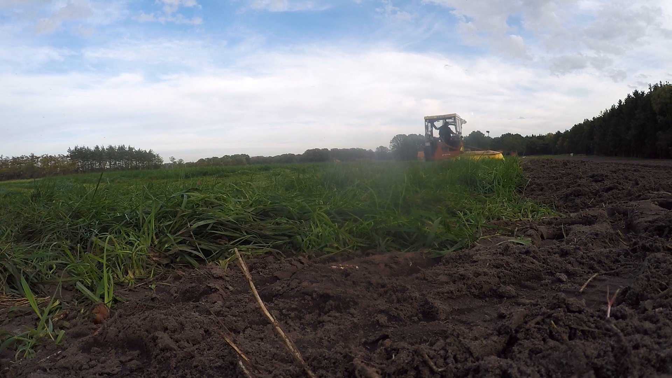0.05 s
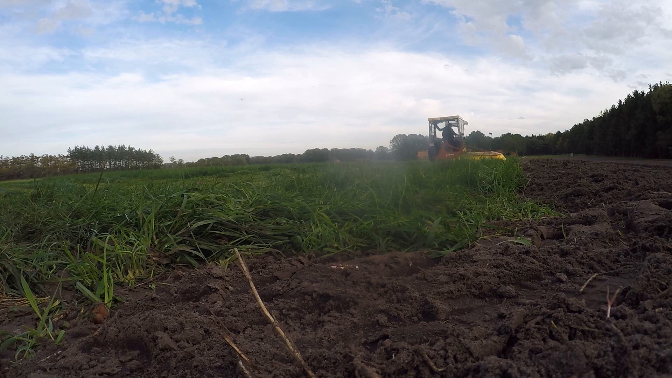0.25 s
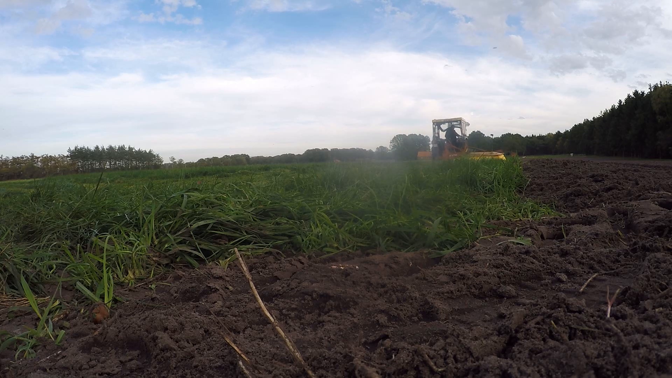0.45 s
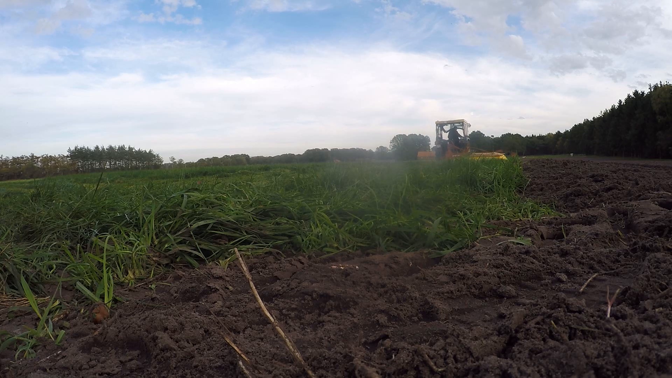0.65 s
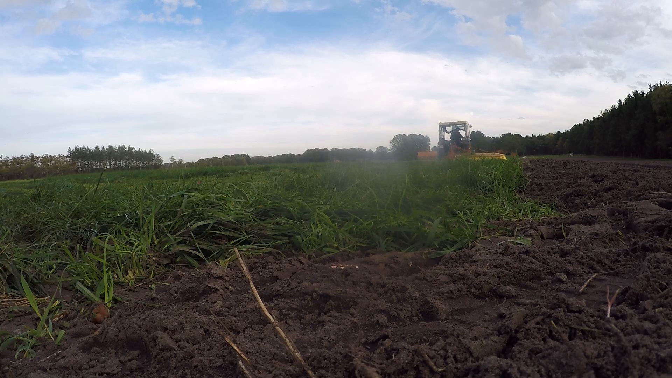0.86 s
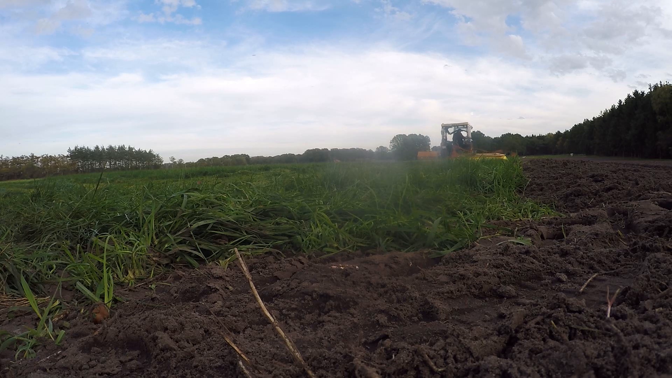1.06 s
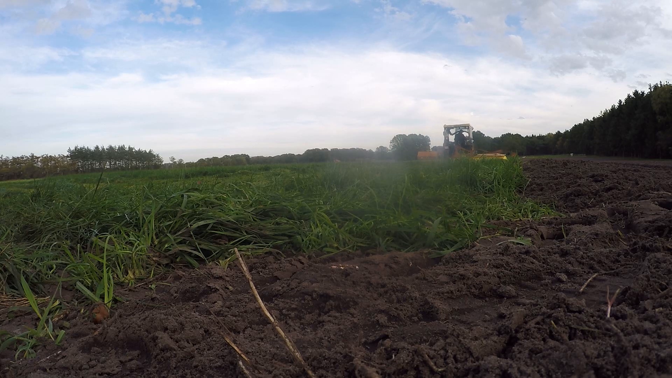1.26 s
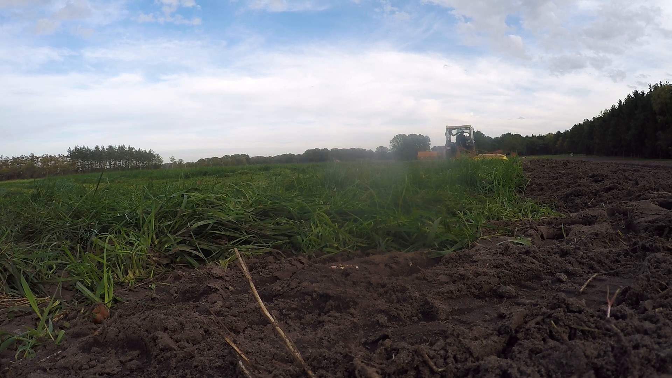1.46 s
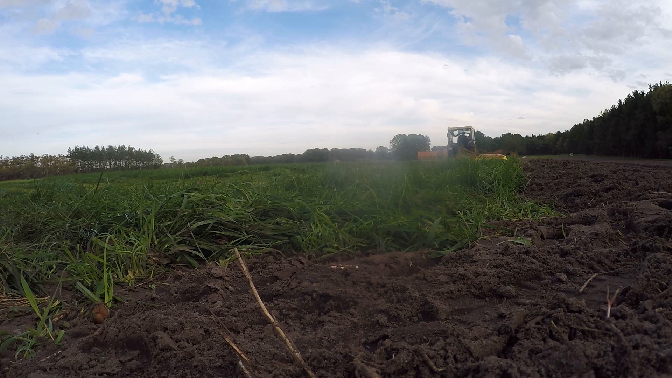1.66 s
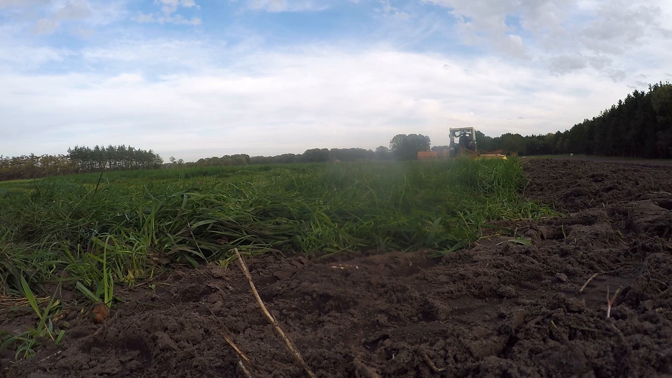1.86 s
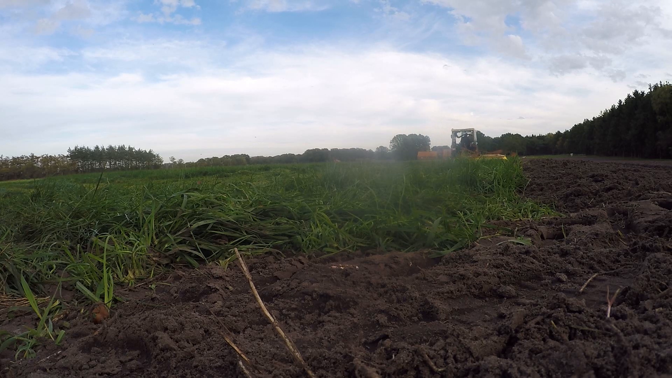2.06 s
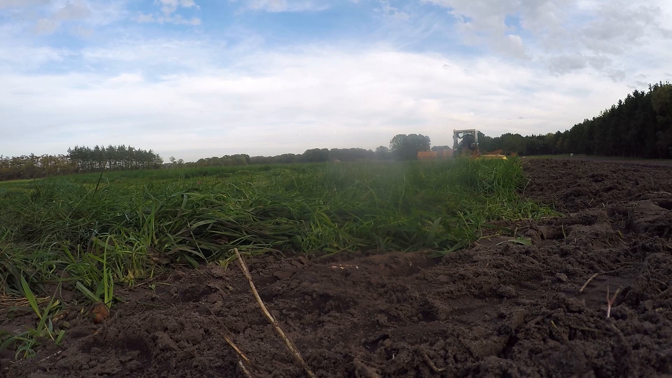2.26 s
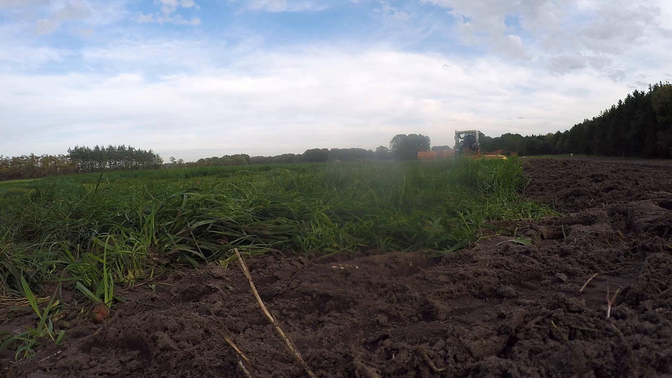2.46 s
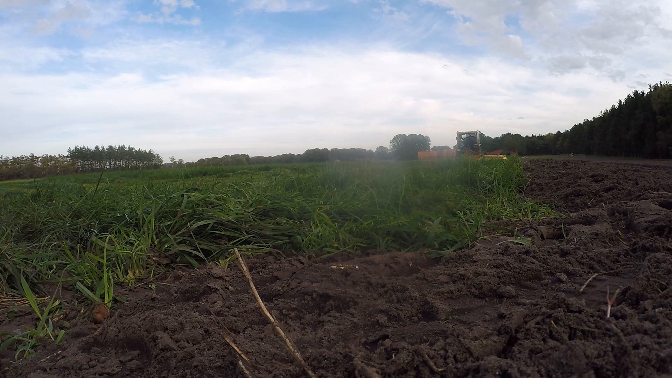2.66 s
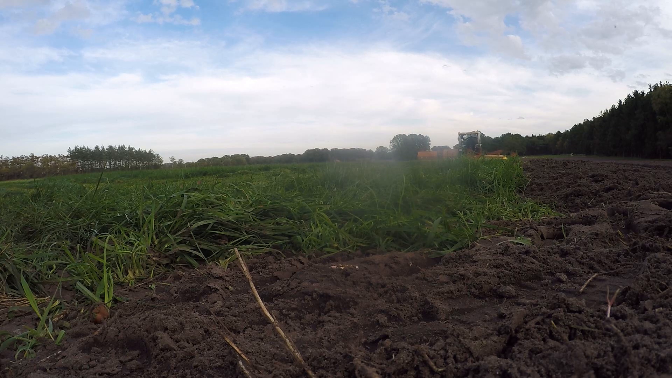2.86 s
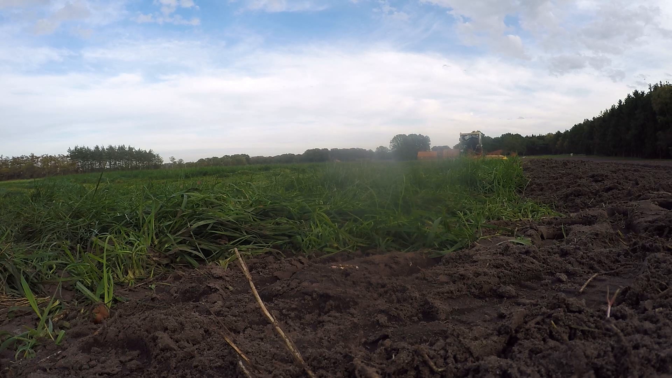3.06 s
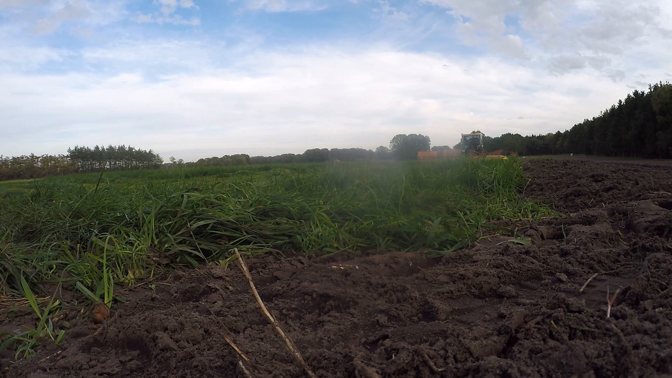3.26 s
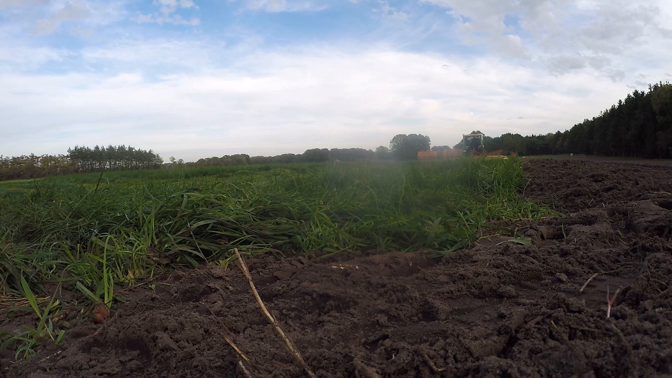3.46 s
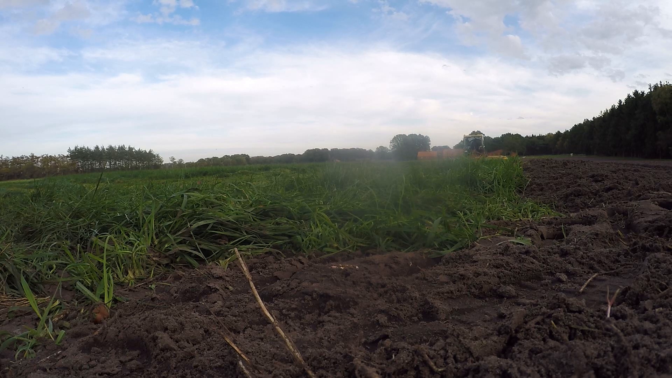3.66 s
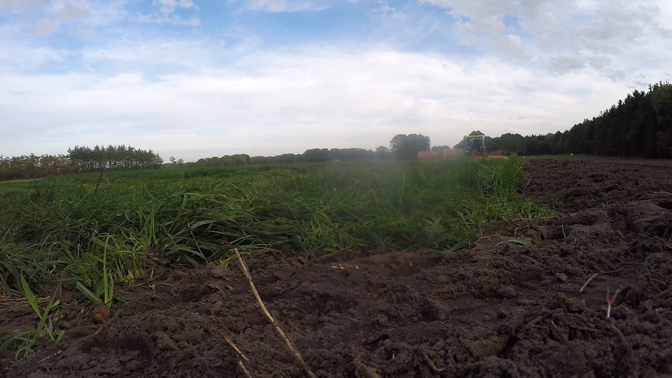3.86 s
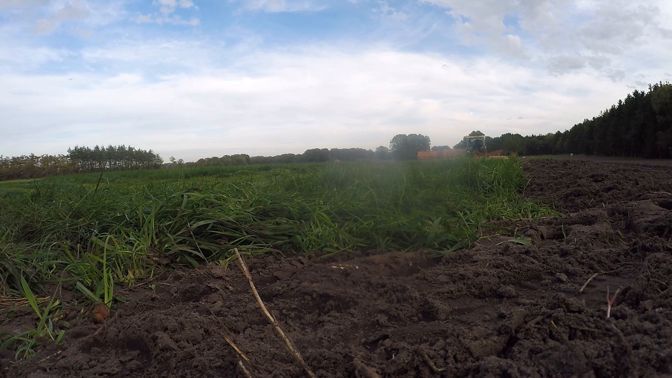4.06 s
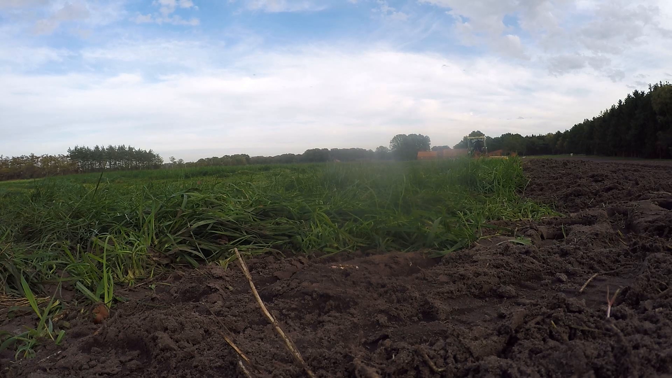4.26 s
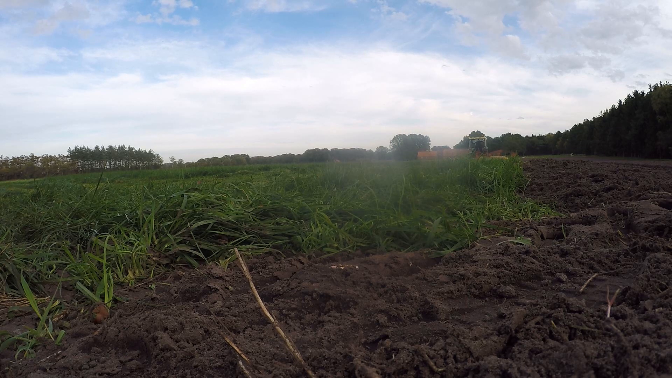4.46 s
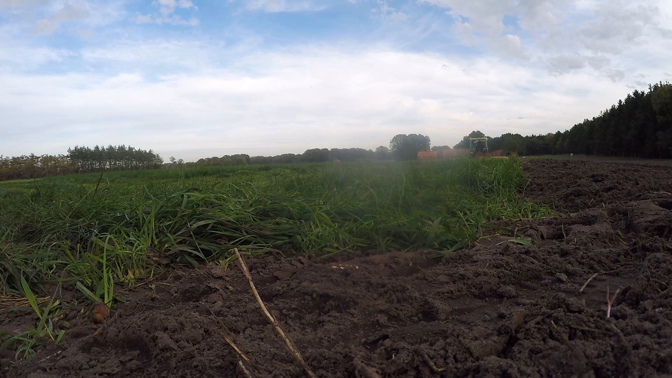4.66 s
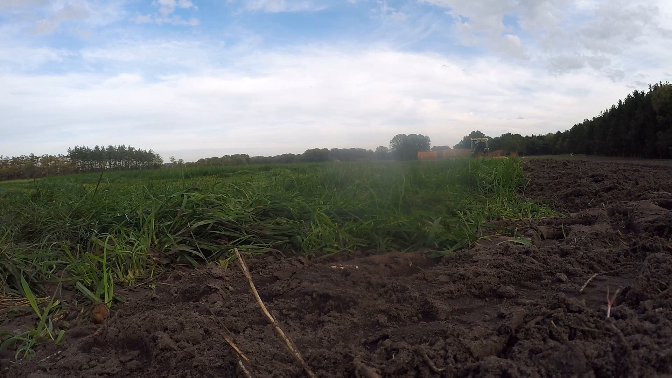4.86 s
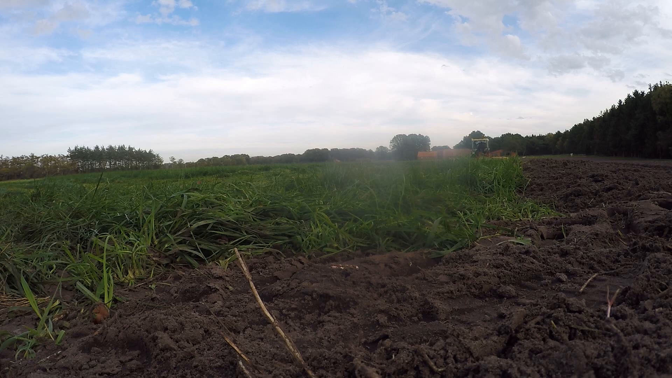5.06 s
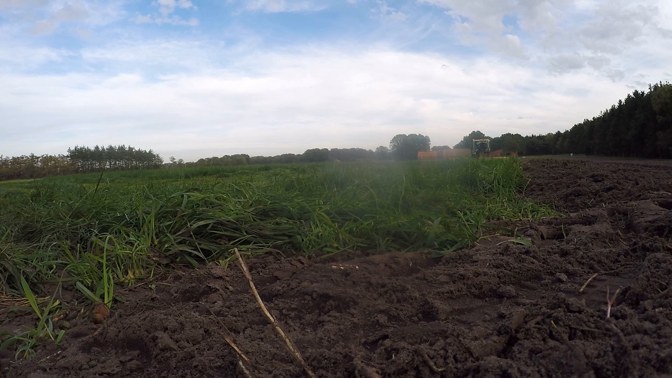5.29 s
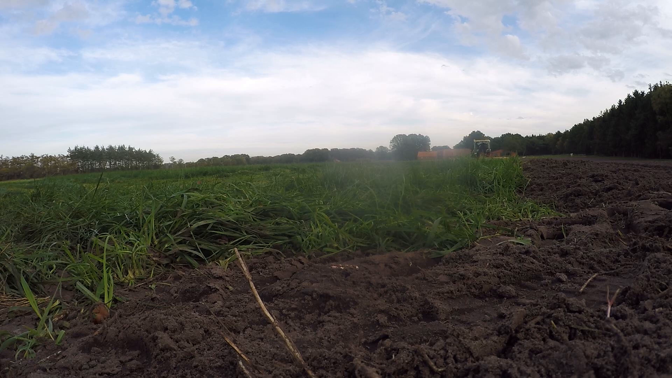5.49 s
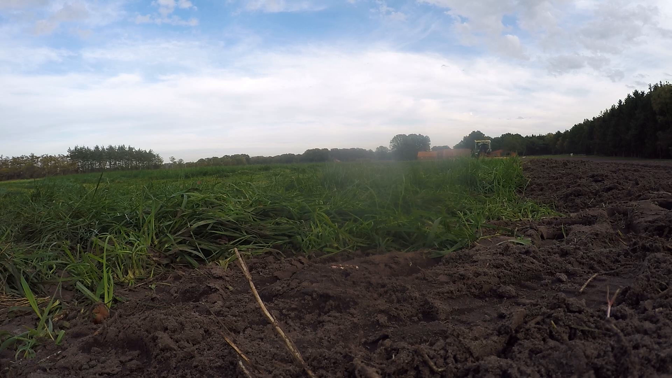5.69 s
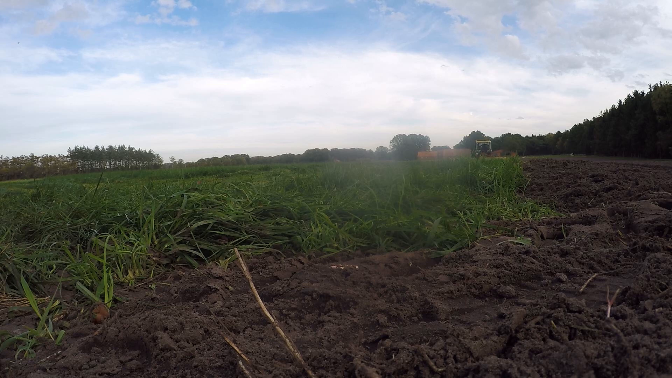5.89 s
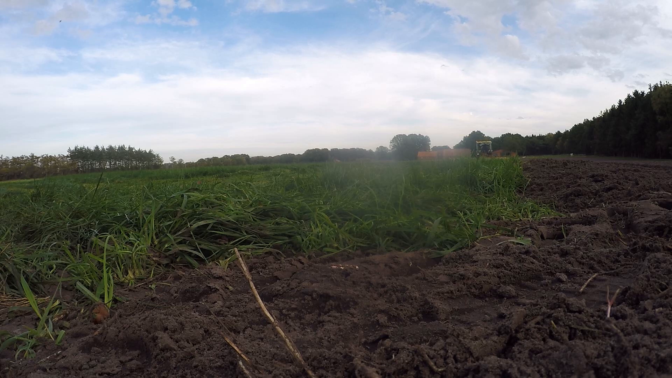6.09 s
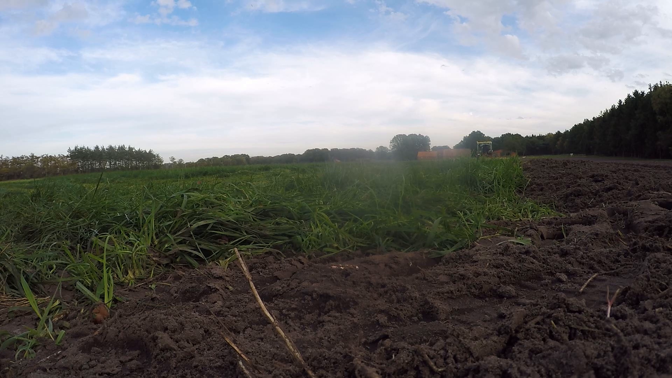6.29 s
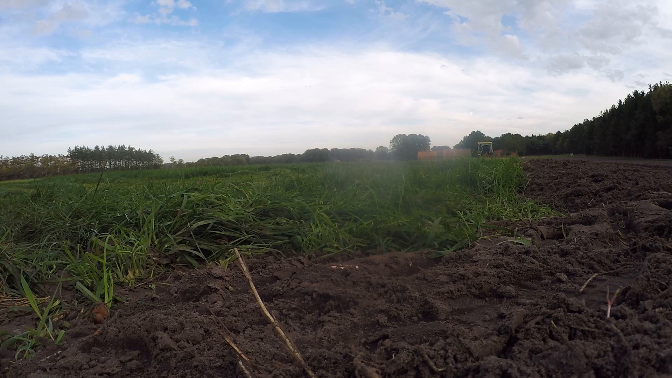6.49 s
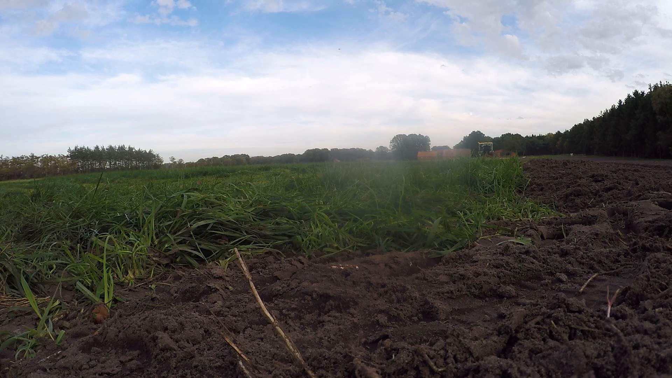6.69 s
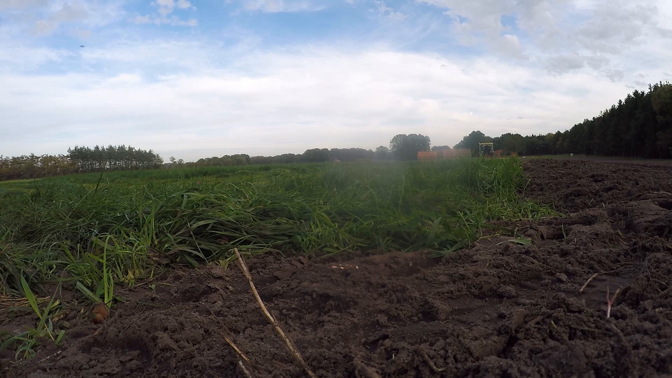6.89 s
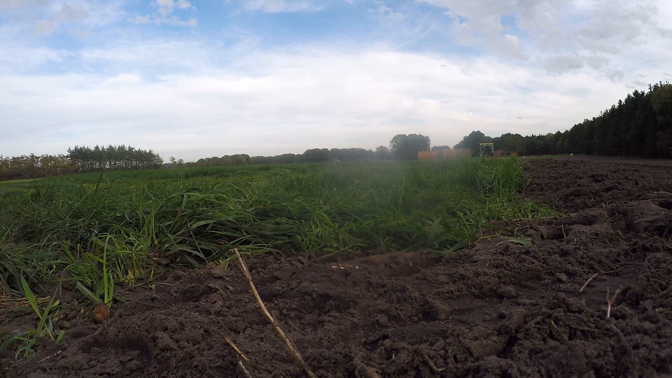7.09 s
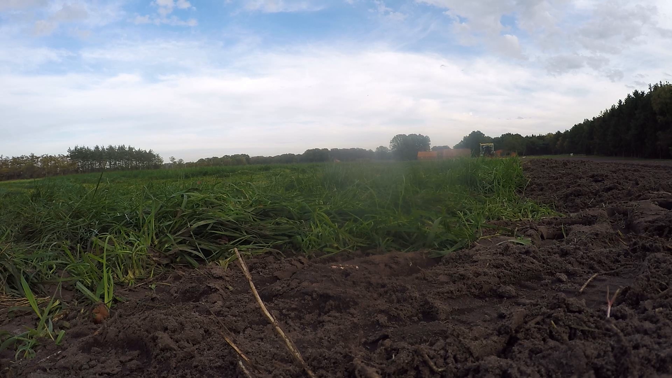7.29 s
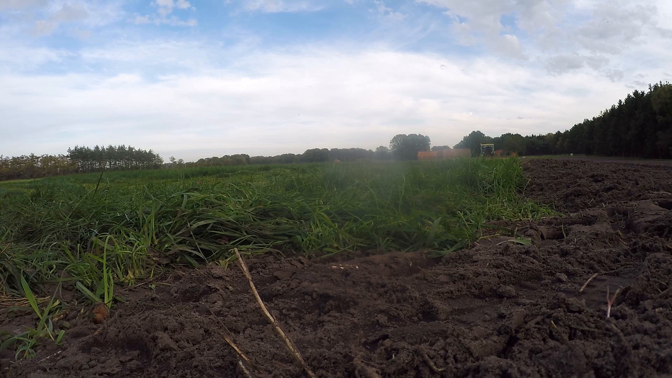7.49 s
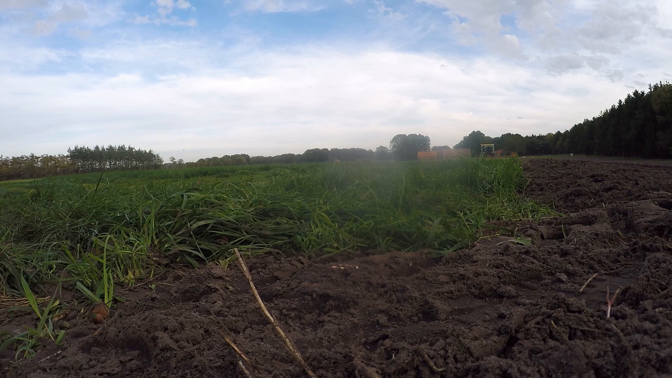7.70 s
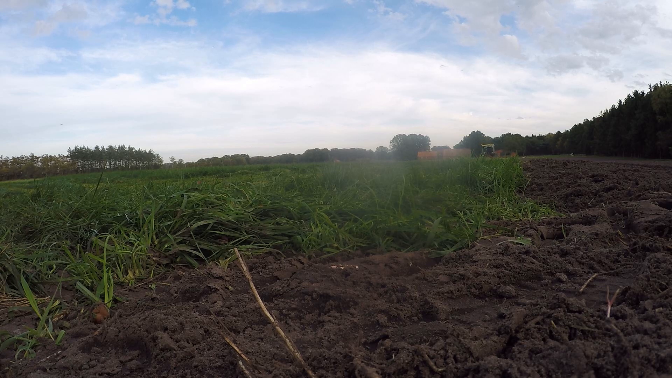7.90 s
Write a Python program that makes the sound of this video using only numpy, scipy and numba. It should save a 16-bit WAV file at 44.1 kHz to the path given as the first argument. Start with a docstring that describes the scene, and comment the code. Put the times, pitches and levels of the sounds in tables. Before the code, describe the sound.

Heard from ground level, a low tractor engine hums and roars while mower steel clatters, scrapes and squeaks, receding gradually into the distance.

```python
"""A three-cylinder tractor pulls a mower away across a field, heard from ground level, over steady hiss.
From the start firings drone, rotors hum, air roars, and struck steel clatters, scrapes and squeaks.
At 0.2-0.45 s the firing rate sags under load, then recovers; a moan rises over 0.33-1.04 s.
Brief low swells come at 0.4-5.8 s; at 4.55-6.55 s the high ringing of the steel lifts, finest modes last.
Drone, hum, roar and clatter weaken with distance; the ground edge on roar and hum sinks."""
import sys
import numpy as np
from scipy import signal
from scipy.fft import rfft, irfft
from scipy.io import wavfile
from numba import njit

SR = 44100
rng = np.random.default_rng(int(sys.argv[2]) if len(sys.argv) > 2 else 0)


def digitize_waveform(pressure):
    """Quantize a signal to 16-bit integers and store it at the path in sys.argv[1].

    Rows of a 2-D input are taken as channels; values are limited to [-1, 1].
    """
    field = np.atleast_2d(pressure).T
    bounded = np.clip(field, -1, 1)
    quanta = np.round(bounded * 32767).astype(np.int16)
    wavfile.write(sys.argv[1], SR, quanta)


N = 350154
T = np.arange(N) / SR
BINS_HZ = np.fft.rfftfreq(N, 1 / SR)

# engine speed under load: time_s, firing_hz
FIRING_CURVE = [(0, 52.4), (.2, 52.5), (.45, 51.15), (.7, 51.25), (1, 51.75), (1.5, 52.15), (2.8, 52.35),
                (3.8, 52.6), (7.94, 52.7)]
# weaker engine orders: multiple of firing rate, level_db against the firing tone
ENGINE_ORDERS = [(2 / 3, -27), (4 / 3, -23), (5 / 3, -22), (8 / 3, -17), (3, -10.3), (4, -19)]
# mower rotation tones at working speed: pitch_hz, relative_db
ROTOR_TONES = [(32.7, -14), (65.4, -22), (84.7, -15), (169.5, -7), (228.5, -13), (264, -20), (286, -18.5),
               (319, -16), (353, -19), (367, -17), (424, -20.5), (489.5, -17.5), (512, -22.5), (523, -19),
               (555, -22)]
# roar spectrum ahead of the ground: freq_hz, relative_db
ROAR_COLOUR = [(10, -25), (24, -17), (34, -7), (45, -7.5), (120, -6.5), (175, -2), (220, 1), (300, -0.5),
               (400, -3), (510, -2.35), (640, -2.5), (900, -3.5), (1150, -9), (2000, 3.5)]
# roar swell: time_s, offset_db
ROAR_SURGE = [(0, -2), (.25, -1), (.45, 0.4), (.75, 0.6), (1.1, 1), (1.35, 1.5), (1.5, -1.5), (1.66, 1),
              (2.04, -1), (2.4, 1.1), (2.75, 1), (3.1, -0.9), (3.38, 1.3), (3.6, 0.5), (4.3, 0.9),
              (4.52, 0.9), (5.05, -1.4), (5.35, 0.5), (5.6, -1), (5.85, -0.5), (6.4, -2.5), (6.85, -0.5),
              (7.94, -1.8)]
# field hiss and grass spray spectrum: freq_hz, relative_db
FIELD_COLOUR = [(100, -4), (500, 2.5), (800, 6), (1150, -1), (1400, 1), (2000, -0.5), (3500, -1),
                (5000, -6), (6800, 3.5), (7700, 1.5), (8400, -7), (10200, -3), (11500, -23), (15000, -26)]
# broad ring of the mower panels: freq_hz, relative_db
PANEL_COLOUR = [(500, -11), (1000, -14), (1400, -12.5), (2000, -6.5), (2600, -1.5), (3500, 3), (4500, 0.5),
                (5100, 1.5), (5450, -1), (5900, -1), (6700, -4.5), (7700, -8.5), (8300, -21), (10200, -12),
                (11500, -23)]
# spectrum of the lightest blows: freq_hz, relative_db
SIZZLE_COLOUR = [(3000, -4), (6500, -2.5), (8500, 7.5), (10300, 1.5), (11300, 0), (13000, -6), (14700, -12),
                 (16000, -11)]
# landing grit spectrum: freq_hz, relative_db
TICK_COLOUR = [(3000, -34), (8000, -10), (9600, 7), (10800, 0), (12500, -16), (15000, -10)]
# low steel modes: freq_hz, width_hz, relative_db
LOW_MODES = [(2130, 30, -14), (2290, 30, -14), (2515, 25, -14), (2670, 35, -9), (3340, 40, -8),
             (3520, 45, -8), (3680, 55, -6), (3860, 45, -8.5), (4200, 70, -9), (4280, 45, -4.5),
             (4875, 50, -6), (4950, 45, -5.5), (5110, 35, -9)]
# thin steel modes, fading fastest with distance: freq_hz, width_hz, relative_db
THIN_MODES = [(1849, 18, -6.5), (2946, 16, 0), (3255, 30, -3), (5262, 24, -1.5)]
# close pair of singing steel modes: freq_hz, width_hz, relative_db
SINGING_MODES = [(4084, 28, 0), (4112, 28, 0)]
# high steel modes: freq_hz, width_hz, relative_db
HIGH_MODES = [(6170, 70, -4.5), (6434, 20, 3), (6530, 45, -2), (6600, 45, 2.5), (6680, 50, -3),
              (6790, 60, -5), (7640, 70, -11), (7737, 18, -1), (8030, 50, -10), (9136, 50, -7),
              (9600, 50, -13), (9856, 25, -11), (10116, 20, -8), (10520, 20, -8), (10850, 40, -16)]
# finest steel modes: freq_hz, width_hz, relative_db
FINE_MODES = [(11462, 40, -5), (11680, 50, -6), (11880, 70, -4), (12400, 160, -5), (12700, 200, -9),
              (13227, 45, -1.5), (13540, 110, -6), (13820, 150, -11), (14240, 60, -2), (14580, 45, 0),
              (14950, 350, -10)]
# force on the mower steel: time_s, offset_db
RATTLE = [(0, -1.5), (.25, -2.5), (.5, -1.2), (.8, -0.1), (1.3, 0), (1.55, 0), (1.95, -1.5), (2.25, -0.5),
          (2.45, 0.7), (2.7, -1.3), (3.05, 1), (3.7, 0.5), (3.83, -3.5), (3.98, 1), (4.55, 0.3), (5, 0),
          (5.55, 1.2), (6.15, 2), (6.6, -2), (7.4, -1.1), (7.8, -3.5), (7.94, 0)]
# sudden changes of force, mostly harder knocks: start_s, lift_db
KNOCKS = [(.123, 2), (.284, 7.5), (.409, 2), (.846, 1.5), (1.219, 2.5), (1.533, -3), (1.776, 6.5),
          (2.061, 7.5), (3.26, -2), (3.683, 3), (4.551, 2), (5.144, 4), (5.544, 5.5), (6.346, 2),
          (7.016, 6), (7.388, 4), (7.621, 6), (7.927, 3)]
# dry joints slipping: start_s, level_db, pitch_hz
SQUEAKS = [(.158, -23, 7000), (.509, -29, 7100), (.636, -29, 7730), (.793, -30, 7100), (.916, -23, 7600),
           (1.012, -24, 7100), (2.216, -31, 7750), (2.737, -30, 7250), (2.862, -29, 6950),
           (3.135, -30, 6770), (3.166, -29, 7680), (3.506, -28, 7650), (3.658, -26, 7650),
           (4.085, -30, 7600), (4.210, -27, 6600), (4.296, -27, 6580), (4.332, -27, 6850),
           (4.639, -31, 6500), (4.669, -34, 6480), (4.694, -31, 6480), (4.725, -28, 6520),
           (4.729, -32, 7600), (4.785, -34, 6510), (4.789, -36, 7600), (4.843, -29, 6550),
           (4.874, -39, 6600), (4.971, -34, 7680), (5.003, -27, 7350), (5.033, -32, 6500),
           (5.090, -25, 6500), (5.123, -32, 6570), (5.273, -31, 6650), (5.521, -31, 7700),
           (5.549, -28, 6500), (5.553, -32, 7700), (5.577, -28, 6500), (5.610, -31, 6590),
           (5.647, -34, 7720), (5.823, -26, 6550), (5.884, -30, 6650), (6.555, -35, 7550),
           (6.589, -26, 7280), (6.708, -37, 7600), (6.741, -32, 7550), (6.918, -33, 7140),
           (7.171, -35, 7250), (7.202, -31, 7550), (7.234, -36, 7400), (7.658, -30, 7250),
           (7.716, -38, 7650), (7.838, -33, 7650)]
# steel rubbing steel: peak_s, pitch_hz, level_db, half_length_s
SCRAPES = [(.085, 2946, -29.5, .016), (.41, 5262, -36, .03), (.87, 5262, -37.5, .04),
           (1.15, 5262, -38, .04), (.65, 3252, -36, .05), (.66, 4095, -35, .05), (.75, 4115, -29.5, .018),
           (.845, 4095, -28.5, .035), (1.76, 4102, -36, .03), (3.99, 4102, -34.5, .025),
           (4.09, 4102, -37, .02), (6.13, 4102, -43, .11), (7.5, 5110, -49, .18)]
# mower under load: time_s, pitch_hz, level_db
MOAN = [(.33, 460, -45), (.39, 463, -25.5), (.48, 468, -26.5), (.56, 475, -26), (.7, 477, -30),
        (.85, 480, -30), (.97, 484, -30), (1.04, 486, -45)]
# brief low swells: peak_s, pitch_hz, wander_hz, level_db, half_length_s
LOW_SWELLS = [(0.418, 293, 7, -16.5, 0.022), (0.523, 330, 18, -22.5, .09), (0.74, 511, 3, -22.5, 0.072),
              (1.017, 348.4, 28, -21, 0.044), (1.13, 283, 8.3, -26.5, 0.082), (1.286, 460, 14.8, -27, 0.16),
              (2.13, 228.7, 11.7, -21, 0.032), (2.516, 228, 4, -24.5, 0.064), (3.55, 515, 24.3, -34, 0.26),
              (4.203, 530, 25.6, -35, 0.16), (5.356, 225, 28, -27, 0.059), (5.796, 205, 28, -28.5, 0.18)]
# grit landing: start_s, level_db
TICKS = [(.0493, -25), (.0877, -27), (.8585, -27), (1.037, -25), (1.1279, -28), (1.1828, -30),
         (1.2556, -29), (1.3394, -26), (1.3793, -26), (1.4726, -23), (1.4921, -26), (1.5035, -23),
         (1.5609, -30), (1.6342, -32), (1.8512, -29), (1.9345, -27), (2.2304, -31), (4.4688, -28)]

WORKING_HZ, ROTOR_HZ = 52.5, 32.6  # firing rate and main rotor rate at working speed
TOP_HZ = 15200
START_M, DRIVE_M_PER_S = 11.05, 2.38
# start level_db, loss_db per doubling of distance
FIRING_DB, OCTAVE_DB = (-20.5, 5.5), (-21.5, 3.5)
ROAR_DB, HUM_DB = (-20.5, 4), (-19.5, 8)
PANEL_DB, LOW_RING_DB = (-26.5, 8), (-32.5, 7.5)
THIN_RING_DB, SINGING_DB = (-34.5, 11), (-34.5, 8.5)
HIGH_RING_DB, SIZZLE_DB = (-43, 4), (-46.5, 6)
GROUND_EDGE_HZ, GROUND_SINK_POWER = 664, 0.52  # edge at start, power of relative distance
SIZZLE_POWER = 1.4  # sizzle dB per dB of rattle
# start_s, end_s, edge_s, lift_db
HIGH_LIFT, FINE_LIFT = (4.55, 6.0, 0.14, 6.2), (4.9, 6.55, .5, 9)
KNOCK_DECAY_S, FLURRY_DECAY_S = 0.018, 0.005
MODE_FLICKER_DB, MODE_FLICKER_HZ = 2.3, 16  # shared by each interleaved set of modes


def undb(db):
    """Decibels to gain."""
    return 10 ** (np.asarray(db) / 20)


def unit(x):
    """Scale to rms 1."""
    return x / np.sqrt(np.mean(x ** 2))


def curves(table):
    """Table columns joined by straight lines in time."""
    s, *columns = np.transpose(table)
    return [np.interp(T, s, c) for c in columns]


def walk(rate_hz, size=8192):
    """Smooth random curve of rms 1, rolled off above rate_hz."""
    hz = np.fft.rfftfreq(size, T[-1] / size)
    slow = irfft(rfft(rng.standard_normal(size)) / (1 + (hz / rate_hz) ** 4))
    return np.interp(T, np.linspace(0, T[-1], size), unit(slow))


def colour(x, points):
    """Minimum-phase filter through (freq_hz, relative_db), scaled to rms 1."""
    hz, db = np.transpose(points)
    gain = undb(np.interp(np.log(BINS_HZ + 1), np.log(hz), db))
    cepstrum = irfft(np.log(gain), N)
    response = np.exp(2 * rfft(cepstrum[:N // 2], N))
    return unit(irfft(rfft(x) * response, N))


def ring(x, modes, count=4):
    """Resonances with own short delays, in interleaved sets that flicker separately; rms 1."""
    drive, out = rfft(x), 0
    for k in range(count):
        response = np.zeros(len(BINS_HZ), complex)
        for hz, width_hz, db in modes[k::count]:
            lag_s = .004 * rng.random()
            resonance = undb(db) / (1 + 2j * (BINS_HZ - hz) / width_hz)
            response += resonance * np.exp(-2j * np.pi * BINS_HZ * lag_s)
        flicker = undb(MODE_FLICKER_DB * walk(MODE_FLICKER_HZ))
        out = out + irfft(drive * response, N) * flicker
    return unit(out)


def tone(hz):
    """Sine of rms 1 following a frequency curve, random start phase."""
    return np.sqrt(2) * np.sin(2 * np.pi * (np.cumsum(hz) / SR + rng.random()))


@njit
def lowpass(x, edge_hz, damping):
    """State-variable low-pass with a moving edge."""
    y, band, low = np.empty(len(x)), 0., 0.
    for i in range(len(x)):
        g = np.tan(np.pi * edge_hz[i] / SR)
        v = (band + g * (x[i] - low)) / (1 + g * (g + damping))
        y[i] = low + g * v
        band, low = 2 * v - band, 2 * y[i] - low
    return y


def impacts(per_second, spread_db):
    """Random blows, most weak and a few strong; rms 1."""
    hit = rng.random(N) < per_second / SR
    size = undb(spread_db * np.minimum(rng.exponential(size=N), 5))
    return unit(hit * size * rng.choice([-1, 1], N))


def distance():
    """Distance over starting distance, at constant drive speed."""
    return 1 + DRIVE_M_PER_S * T / START_M


def receding(part):
    """Level in dB falling by a fixed loss per doubling of distance."""
    start_db, loss_db = part
    return start_db - loss_db * np.log2(distance())


def ground_edge():
    """Edge in Hz above which soft ground swallows sound; sinks with distance."""
    return GROUND_EDGE_HZ / distance() ** GROUND_SINK_POWER


def spell(row):
    """Lift in dB that rises, holds and falls."""
    start_s, end_s, edge_s, lift_db = row
    return lift_db * np.clip(np.minimum(T - start_s, end_s - T) / edge_s, 0, 1)


def field(turn, level_db=-42):
    """Steady outdoor hiss; its top pulses with the rotor as cut grass sprays out."""
    air = rng.standard_normal(N)
    spray = signal.sosfiltfilt(signal.butter(2, 5000, "high", fs=SR, output="sos"), air)
    pulse = undb(2.2 * turn + 1.8 * walk(90))
    return undb(level_db) * colour(air + spray * (pulse - 1), FIELD_COLOUR)


def ticks(decay_s=0.00086):
    """Bright decaying noise cracks of grit flung by the blades and landing."""
    blows = np.zeros(N)
    for s, db in TICKS:
        blows[int(s * SR)] = undb(db)
    fading = signal.lfilter([1], [1, -np.exp(-1 / (decay_s * SR))], blows)
    return fading * colour(rng.standard_normal(N), TICK_COLOUR)


def roar(firing_hz, db_per_hz=0.2, brightening_per_hz=0.058):
    """Churned air and gas throbbing with firings, louder and brighter under load, cut by the ground."""
    sag_hz = WORKING_HZ - firing_hz
    surge_db, = curves(ROAR_SURGE)
    edge_hz = ground_edge() * (1 + brightening_per_hz * sag_hz)
    throb = undb(0.65 * tone(firing_hz))
    air = colour(rng.standard_normal(N) * throb, ROAR_COLOUR)
    heard = lowpass(lowpass(air, edge_hz, 2.3), edge_hz, 0.84)
    return unit(heard) * undb(receding(ROAR_DB) + db_per_hz * sag_hz + surge_db)


def low_swells():
    """Brief low swells, some a clear tone and some roughly wandering in pitch."""
    wander = walk(35.6)
    return sum(undb(db) * np.exp(-((T - s) / half_s) ** 2) * tone(hz + wander_hz * wander)
               for s, hz, wander_hz, db, half_s in LOW_SWELLS)


def scrapes():
    """Steel rubs on steel; a single mode swells roughly and fades."""
    out = np.zeros(N)
    for s, hz, db, half_s in SCRAPES:
        grip_db = 2.5 * walk(45)
        swell = np.exp(-((T - s) / half_s) ** 2)
        out += undb(db + grip_db) * swell * tone(hz + 24 * walk(50))
    return out


def squeaks(swell_s=0.0041, width_hz=480, faint_db=-42, count=60):
    """Dry joints slip: noise bursts ring a broad resonance; fainter random slips join them."""
    out = np.zeros(N)
    t = np.arange(SR // 16) / SR
    swell = (t / swell_s) ** 2 * np.exp(2 * (1 - t / swell_s))
    swell_rms = np.sqrt(np.mean(swell ** 2) / 2)  # that of a sine under the swell
    faint = [(when * T[-1], faint_db + 4 * size, 6200 + 1600 * pitch)
             for when, size, pitch in rng.random((count, 3))]
    for s, db, hz in list(SQUEAKS) + faint:
        band_hz = [hz - width_hz / 2, hz + width_hz / 2]
        joint = signal.butter(2, band_hz, "band", fs=SR, output="sos")
        slips = swell * rng.standard_normal(len(t))
        chirp = unit(signal.sosfilt(joint, slips)) * swell_rms
        start = int(s * SR)
        out[start:start + len(t)] += (undb(db) * chirp)[:N - start]
    return out


def moan(waver=0.003):
    """A connected rough tone rises as the mower bites into grass, then sinks into the roar."""
    hz, db = curves(MOAN)
    gate = [0] + [1] * (len(MOAN) - 2) + [0]
    sounding = np.interp(T, [row[0] for row in MOAN], gate)
    rough_db = 2.2 * walk(35)
    return sounding * undb(db + rough_db) * tone(hz * (1 + waver * walk(22)))


def rotors(speed):
    """Hum of spinning mower parts geared to the engine, wavering with the grass load, ground-filtered."""
    slip = 1 + 0.002 * walk(3.45)
    hum = sum(undb(db + 2.6 * walk(3.5)) * tone(hz * speed * slip) for hz, db in ROTOR_TONES)
    return lowpass(hum, ground_edge(), 1.) * undb(receding(HUM_DB))


def clatter(turn):
    """Dense blows ring the mower steel, bunched once a rotor turn and in uneven flurries."""
    rattle_db, = curves(RATTLE)
    panel_db = receding(PANEL_DB) + rattle_db
    low_db = receding(LOW_RING_DB) + rattle_db
    thin_db = receding(THIN_RING_DB) + rattle_db
    singing_db = receding(SINGING_DB) + rattle_db + 2 * walk(18)
    high_db = receding(HIGH_RING_DB) + rattle_db + spell(HIGH_LIFT)
    sizzle_db = receding(SIZZLE_DB) + SIZZLE_POWER * rattle_db
    knock_db = sum(db * (T > s) * np.exp(-np.abs(T - s) / KNOCK_DECAY_S) for s, db in KNOCKS)
    # flurries start at once and die away
    jolts = np.abs(impacts(per_second=150, spread_db=2.3))
    flurry = unit(signal.lfilter([1], [1, -np.exp(-1 / (FLURRY_DECAY_S * SR))], jolts))
    force = undb(0.61 * turn) * (1 + 0.34 * flurry) * undb(knock_db)
    panels = colour(force * impacts(per_second=18000, spread_db=2.0), PANEL_COLOUR)
    low = ring(force * impacts(per_second=2500, spread_db=2.0), LOW_MODES)
    thin = ring(force * impacts(per_second=2500, spread_db=0.0), THIN_MODES)
    singing = ring(force * impacts(per_second=600, spread_db=3.5), SINGING_MODES, count=2)
    high_force = force * undb(1.4 * walk(31) + turn)
    high = ring(high_force * impacts(per_second=2500, spread_db=2.0), HIGH_MODES)
    # lightest blows reach only the top of the range
    fine_force = force * undb(.5 * turn)
    fine = colour(fine_force * impacts(per_second=11000, spread_db=4.0), SIZZLE_COLOUR)
    fine_ring = ring(force * impacts(per_second=2400, spread_db=4.0), FINE_MODES)
    sizzle = undb(6.5) * fine + undb(spell(FINE_LIFT) - 8.0) * fine_ring
    steel = undb(panel_db) * panels + undb(low_db) * low + undb(thin_db) * thin
    steel += undb(singing_db) * singing + undb(high_db) * high
    return steel + undb(sizzle_db) * sizzle


def engine(firing_hz):
    """Exhaust drone; unequal cylinders add orders at thirds of the firing rate."""
    first_db = receding(FIRING_DB) + 0.32 * walk(2.1)
    octave_db = receding(OCTAVE_DB) + 0.9 * walk(18.0)
    drone = undb(first_db) * tone(firing_hz) + undb(octave_db) * tone(2 * firing_hz)
    for order, db in ENGINE_ORDERS:
        drone += undb(first_db + db + 2 * walk(12)) * tone(order * firing_hz)
    return drone


def scene():
    """Tractor and mower in the open field, geared to one engine speed; mono."""
    firing_hz, = curves(FIRING_CURVE)
    speed = firing_hz / WORKING_HZ
    turn = tone(ROTOR_HZ * speed)
    background = field(turn) + ticks() + roar(firing_hz) + low_swells()
    mower = scrapes() + squeaks() + moan() + rotors(speed) + clatter(turn)
    return (background + mower + engine(firing_hz))[None]


def record(dry):
    """Steep elliptic low-pass at TOP_HZ."""
    return signal.sosfilt(signal.ellip(12, .1, 90, TOP_HZ, fs=SR, output="sos"), dry)


dry = scene()
out = record(dry)
digitize_waveform(out)
```